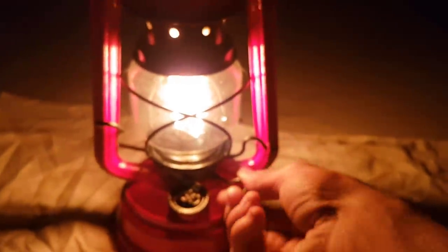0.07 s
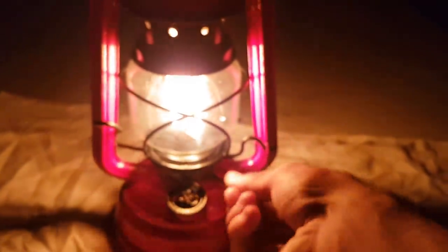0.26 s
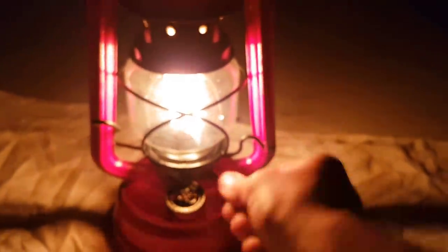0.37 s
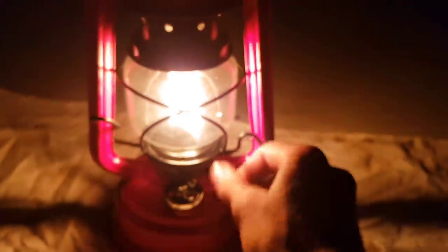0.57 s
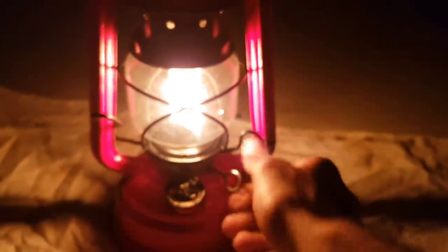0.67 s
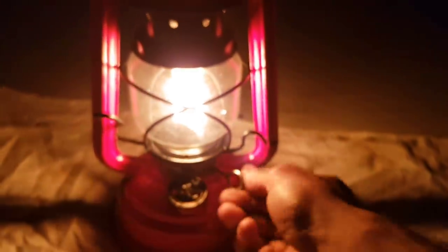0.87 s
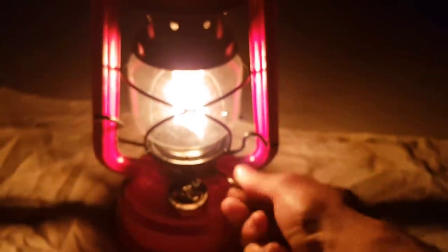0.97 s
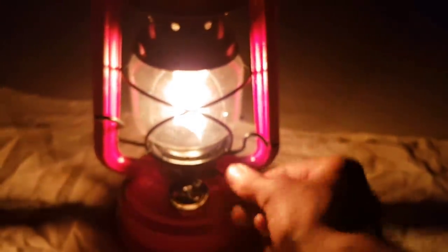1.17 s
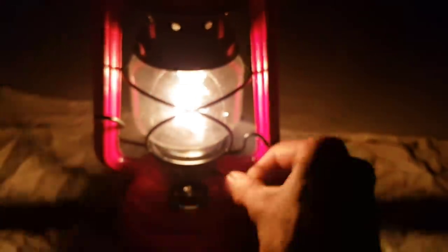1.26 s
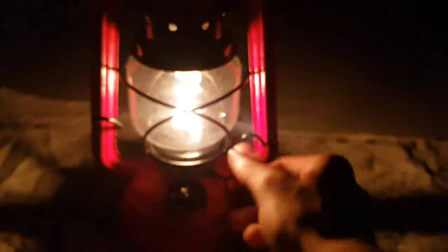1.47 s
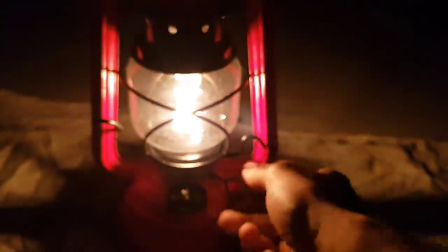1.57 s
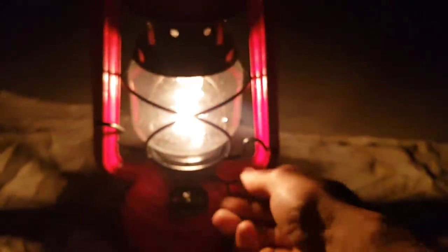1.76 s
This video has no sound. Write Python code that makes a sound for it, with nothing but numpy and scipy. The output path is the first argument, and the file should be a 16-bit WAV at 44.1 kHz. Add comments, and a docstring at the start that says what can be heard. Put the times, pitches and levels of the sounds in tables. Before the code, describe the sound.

A lantern's wick knob clicks as it is turned, close by in a small, quiet room. A loud, tinny crack rings briefly at 0.2 seconds, followed by a faint rub at 0.4. A click with a hollow knock from the tank lands at 0.7 seconds, a softer one at 1.0, and three light ticks around 1.2 to 1.4. Low room rumble and thin hiss continue underneath.

```python
"""Sharp, tinny clicks, close by in a small quiet room: a hand turns the wick knob of a storm lantern.
The adjuster sticks and lets go; each slip cracks the thin metal and rings the burner, and one
lands a hollow knock on the fuel tank. Between clicks the spindle rubs and hums faintly and the hand
bumps the lantern. Underneath lies a bed of low room rumble and thin hiss."""
import sys
import numpy as np
from scipy import signal
from scipy.io import wavfile

SR = 44100
rng = np.random.default_rng(int(sys.argv[2]) if len(sys.argv) > 2 else 0)


def master_out(mix):
    """Clip the mix to full scale and print it as 16-bit PCM to the path in sys.argv[1]."""
    frames = np.transpose(np.atleast_2d(mix))
    ceiling = np.clip(frames, -1, 1)
    pcm = np.round(ceiling * 32767).astype(np.int16)
    wavfile.write(sys.argv[1], SR, pcm)


N = 79380
TIME = np.arange(N) / SR
EDGES = 20 * 2 ** np.arange(0, 9.7, 1 / 3)
# third-octave bands: (low [Hz], high [Hz], centre [Hz])
BANDS = list(zip(EDGES, EDGES[1:], np.sqrt(EDGES[:-1] * EDGES[1:])))

# adjuster slips: (time [s], level [dB], brightness [dB/octave], tank send [dB], burner send [dB])
ADJUSTER_CLICKS = [(0.2160, -24.5, -3, -21, 7.5), (0.2320, -7, 0, 3, 7.5), (0.6553, -23, 1, 22, -3.5),
                   (0.9742, -31, -3, 5.5, 8), (1.239, -31, -3.5, -21, 0.5),
                   (1.2922, -30.5, -5.5, -26, -5.5), (1.347, -34, -5, -27, -4.5)]
# glancing contacts around a click, all crack and no ring: (time [s], level [dB], brightness [dB/octave])
CLICK_CHATTER = [(0.229, -12, 1), (0.2331, -3, -1.5), (0.2346, -4.5, 2), (0.6582, -22, 2.5),
                 (0.9700, -37, 2), (0.981, -44.5, 3)]
# spindle rubs: (middle [s], length [s], grain level [dB], brightness [dB/octave])
SPINDLE_RUBS = [(0.226, .014, -28.5, -3.5), (0.397, 0.087, -36.5, -4), (0.487, .07, -54, -1),
                (0.677, 0.044, -35.5, -2), (0.966, 0.043, -52, -1), (1.265, 0.065, -41, -4),
                (1.704, 0.11, -59.5, -7)]
# ring of the burner and frame: (frequency [Hz], level [dB], t60 [s])
BURNER_RING = [(742.6, -46, .22), (1150, -26, 0.032), (1130, -46, 0.32), (1205, -31, 0.041),
               (1361, -38.5, 0.099), (1896, -44.5, .35), (2424, -40.5, .16), (3064, -44.5, .12),
               (3793, -35, 0.15), (3993, -36.5, .15), (4276, -33.5, 0.068), (4520, -39, .25),
               (5400, -43.5, .25), (5970, -49.5, .3)]
# colour of the dense, short-lived sheet-metal modes: (frequency [Hz], spectral level [dB])
CRACK_COLOUR = [(40, -20.5), (150, -8.5), (280, 5.5), (420, -9.5), (750, -2.5), (1150, 0.5), (1800, -2),
                (2800, 3), (4000, 5.5), (5500, -2.5), (7200, -1.5), (8600, -14.5), (11300, -2.5),
                (14500, -21)]
# ring of the hollow fuel tank: (frequency [Hz], level [dB], t60 [s])
TANK_RING = [(91, -51.5, 0.12), (182, -49, .1), (243.9, -42, 0.24), (299, -34, 0.082), (315.4, -39, .14),
             (431, -40, 0.058), (477, -43, 0.12), (608, -39, .09), (846, -51, 0.12)]
# colour of the tank's dense, weaker modes: (frequency [Hz], spectral level [dB])
THUD_COLOUR = [(60, -14), (150, -4), (280, 6), (600, 4), (850, -7), (1300, -23), (4000, -59.5)]
# the lantern's hum as the spindle turns: (frequency [Hz], width [Hz], level before the fader [dB])
HUM_RESONANCES = [(568.3, 31, -71.5), (589, 260, -73), (1150, 430, -85), (1868, 180, -81)]
# fader ride on that hum: (time [s], gain [dB])
HUM_FADER = [(0, -46), (0.25, -11.5), (0.6, -9), (0.8, -2.5), (1.05, -2), (1.25, -1.5), (1.45, -10),
             (1.8, -15.5)]
# soft bumps of the hand: (middle [s], length [s], frequency [Hz], level [dB])
HAND_BUMPS = [(0.019, 0.023, 119.4, -63), (0.601, 0.096, 178.8, -67.5), (0.9, 0.12, 109.4, -61),
              (1.032, 0.042, 112, -68), (1.444, 0.038, 75.6, -60), (1.585, 0.12, 68.9, -68)]
# pan of the lantern's direct sound: (frequency [Hz], left minus right [dB])
LANTERN_PAN = [(200, 2.5), (800, 2), (2400, 4), (4400, 3), (8000, 11.5), (15000, 8)]
# colour of the room's echo: (frequency [Hz], gain [dB])
ECHO_COLOUR = [(150, -7.5), (500, -5.5), (1200, -8), (3500, -4.5), (7000, -7.5), (12000, -10.5)]
# length of its tail: (frequency [Hz], t60 [s])
ECHO_DECAY = [(200, 0.53), (600, .4), (3500, .43), (10000, .38)]
# how alike left and right are in the room: (frequency [Hz], correlation [-1 to 1])
STEREO_LIKENESS = [(100, .92), (300, 0.77), (1000, 0.42), (2500, 0.13), (12000, .3)]
# bed of rumble and hiss: (frequency [Hz], spectral level [dB])
BED_COLOUR = [(25, -56.5), (42, -54), (65, -41.5), (110, -44.5), (165, -52), (270, -57), (400, -73.5),
              (580, -70.5), (900, -72.5), (2000, -73.5), (8000, -80), (12500, -74), (15500, -82)]
# low drone in the room: (frequency [Hz], width [Hz], level [dB])
ROOM_DRONE = (112, 10, -73.5)

BRIGHTNESS_ABOVE_HZ = 1050
RUB_GRAINS_PER_S, GRAIN_SPREAD_DB, RUB_SEND_DB = 900, 3.5, -4
ECHO_BUILD_T60_S, RING_ECHO_DB = .03, -3.5
ECHO_PAN_DB, BED_PAN_DB, RIGHT_LAG_S = 4, 1, .00009


def burner():
    """Every contact cracks the thin metal; clicks and rubs also ring the burner. Gives (crack, ring)."""
    clicks = [(time, db, bright, send_db) for time, db, bright, _, send_db in ADJUSTER_CLICKS]
    chatter = [(time, db, bright, -np.inf) for time, db, bright in CLICK_CHATTER]
    times, db, bright, send_db = np.vstack([clicks, chatter, spindle_grains()]).T

    def level_db(hz):
        return db + bright * np.log2(max(hz / BRIGHTNESS_ABOVE_HZ, 1))

    ring = sum(ringing(impulses(times, from_db(level_db(hz) + send_db)), hz, mode_db, t60)
               for hz, mode_db, t60 in BURNER_RING)
    snap, shimmer = (.016, 1.5), (.075, -4)  # (t60 [s], level [dB])
    return dense_modes(times, level_db, CRACK_COLOUR, [snap, shimmer]), ring


def tank():
    """Part of each click reaches the tank, which answers with a hollow knock. Gives (thud, ring)."""
    times, db, _, send_db, _ = np.transpose(ADJUSTER_CLICKS)
    knock_db = db + send_db
    pushes = impulses(times, from_db(knock_db))
    ring = sum((-1) ** k * ringing(pushes, *mode) for k, mode in enumerate(TANK_RING))
    return dense_modes(times, lambda hz: knock_db, THUD_COLOUR, decays=[(.08, -3)]), ring


def spindle_grains(max_grains=256):
    """Rubs are swells of tiny slips: (time [s], level [dB], brightness [dB/octave], burner send [dB])."""
    grains = []
    for middle, length, db, bright in SPINDLE_RUBS:
        places, sizes = rng.random(max_grains), rng.standard_normal(max_grains)
        count = int(np.clip(length * RUB_GRAINS_PER_S, 1, max_grains))
        for place, size in zip(places[:count], sizes[:count]):
            swell_db = 10 * np.log10(np.sin(np.pi * place) + 1e-9)
            grain_db = db + GRAIN_SPREAD_DB * size + swell_db
            grains.append((middle + length * (place - .5), grain_db, bright, RUB_SEND_DB))
    return np.array(grains)


def ringing(pushes, hz, db, t60):
    """One mode of the lantern: each push starts a dying sine."""
    radius, angle = from_db(-60 / (t60 * SR)), 2 * np.pi * hz / SR
    feedback = [1, -2 * radius * np.cos(angle), radius ** 2]
    tone = signal.lfilter([0, np.sin(angle)], feedback, pushes + 1e-18)
    return from_db(db) * pan(at_hz(LANTERN_PAN, hz)) * tone


def dense_modes(times, level_db, colour, decays):
    """Struck modes that blur into noise, with their echo; decays are (t60 [s], level [dB])."""
    out = np.zeros((2, N))
    for low, high, hz in BANDS:
        energy = impulses(times, from_db(level_db(hz) + at_hz(colour, hz)) ** 2)
        power = sum(from_db(db) ** 2 * linger(energy, t60) for t60, db in decays)
        direct = pan(at_hz(LANTERN_PAN, hz)) ** 2 * power
        echo = pan(ECHO_PAN_DB) ** 2 * echo_power(power, hz)
        out += band(np.sqrt(direct + echo) * stereo_noise(hz), low, high)
    return out


def handling():
    """The turning spindle makes the lantern hum faintly; the hand adds soft, low bumps."""
    fader = from_db(np.interp(TIME, *np.transpose(HUM_FADER)))
    hum = fader * sum(narrow_noise(*resonance) for resonance in HUM_RESONANCES)
    bumps = np.zeros(N)
    for middle, length, hz, db in HAND_BUMPS:
        swell = from_db(db) * np.exp(-2 * ((TIME - middle) / length) ** 2)
        bumps += swell * np.sqrt(2) * np.sin(2 * np.pi * (hz * TIME + rng.random()))
    return pan(BED_PAN_DB) * (hum + bumps)


def room_echo(ring):
    """The small room puts a diffuse tail on the ringing modes."""
    click = signal.unit_impulse(N)
    response = sum(band(stereo_noise(hz) * np.sqrt(echo_power(click, hz)), low, high)
                   for low, high, hz in BANDS)
    tail = signal.fftconvolve(ring.mean(axis=0, keepdims=True), response, axes=-1)[:, :N]
    return from_db(RING_ECHO_DB) * pan(ECHO_PAN_DB) * tail


def echo_power(power, hz):
    """The echo's power envelope: it builds quickly and dies sooner in the treble."""
    build_up = linger(power, ECHO_BUILD_T60_S)
    return from_db(at_hz(ECHO_COLOUR, hz)) ** 2 * linger(build_up, at_hz(ECHO_DECAY, hz))


def room_tone(waver_db=2):
    """Low rumble and thin hiss, each band wavering a little, with a faint drone."""
    knots = np.linspace(0, TIME[-1], 20)
    bed = np.zeros((2, N))
    for low, high, hz in BANDS:
        drift_db = waver_db * np.interp(TIME, knots, rng.standard_normal(len(knots)))
        bed += from_db(at_hz(BED_COLOUR, hz) + drift_db) * band(stereo_noise(hz), low, high)
    return pan(BED_PAN_DB) * (bed + narrow_noise(*ROOM_DRONE))


def narrow_noise(hz, width, db):
    """A resonance fed by steady noise, at an rms level of db."""
    noise = band(stereo_noise(hz), max(hz - width / 2, 10), hz + width / 2)
    return from_db(db) * noise / np.sqrt(np.mean(noise ** 2))


def stereo_noise(hz):
    """White noise with the room's stereo width at this pitch."""
    alike = at_hz(STEREO_LIKENESS, hz)
    mid, side = rng.standard_normal((2, N))
    return (np.sqrt(1 + alike) * mid + np.sqrt(1 - alike) * side * [[1], [-1]]) / np.sqrt(2)


def impulses(times, gains):
    """A train of single pushes."""
    return np.bincount((times * SR).astype(int), gains, N)[:N]


def linger(power, t60):
    """Spread energy over an exponential decay."""
    kept = from_db(-120 / (t60 * SR))  # power falls 60 dB in t60
    return signal.lfilter([1 - kept], [1, -kept], power + 1e-24)


def band(x, low, high):
    """Causal band-pass."""
    return signal.sosfilt(signal.butter(2, [low, high], "band", fs=SR, output="sos"), x + 1e-18)


def pan(db):
    """Left and right gains; positive db leans left."""
    return from_db(np.array([[db], [-db]]) / 2)


def at_hz(points, hz):
    """Read a table on a log-frequency axis."""
    frequencies, values = np.transpose(points)
    return np.interp(np.log(hz), np.log(frequencies), values)


def from_db(db):
    """Decibels to gain."""
    return 10 ** (np.asarray(db) / 20)


def scene():
    """The lantern up close and a little to the left, its echo behind it, room tone underneath."""
    crack, burner_ring = burner()
    thud, tank_ring = tank()
    ring = burner_ring + tank_ring
    left, right = crack + thud + ring + handling()
    direct = np.array([left, np.interp(TIME - RIGHT_LAG_S, TIME, right)])
    return direct + room_echo(ring) + room_tone()


def record(dry):
    """A steep high cut on the mix, 70 dB down from 16.5 kHz."""
    return signal.sosfilt(signal.cheby2(12, 70, 16500, fs=SR, output="sos"), dry)


dry = scene()
out = record(dry)
master_out(out)
```